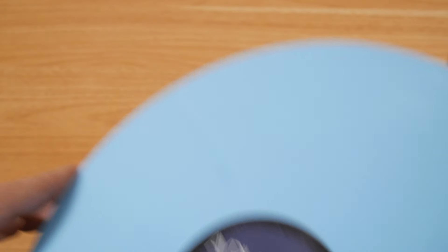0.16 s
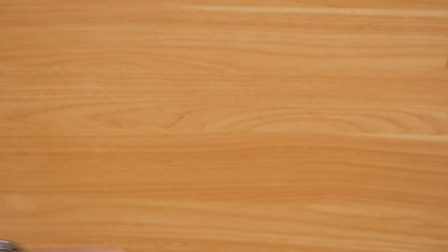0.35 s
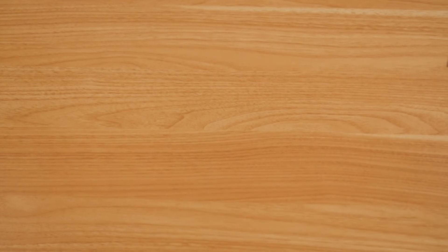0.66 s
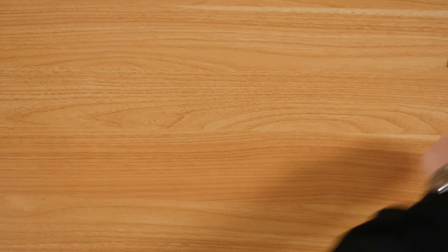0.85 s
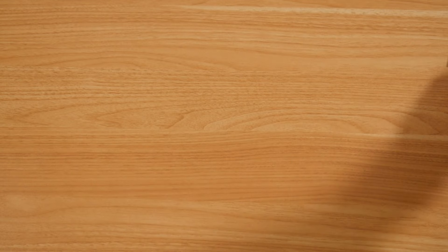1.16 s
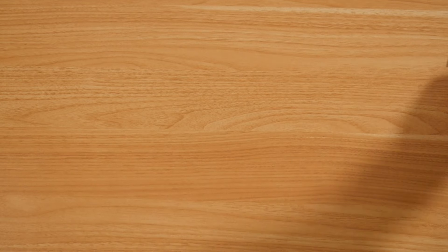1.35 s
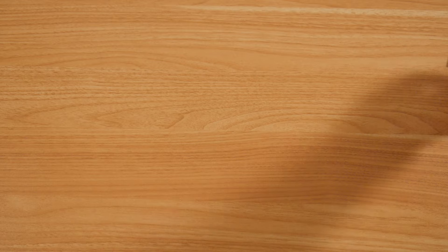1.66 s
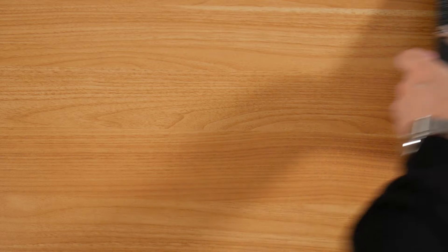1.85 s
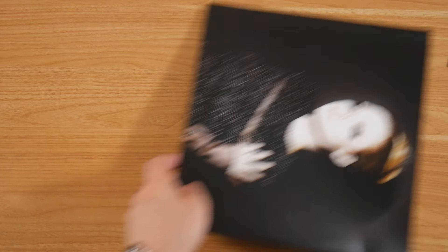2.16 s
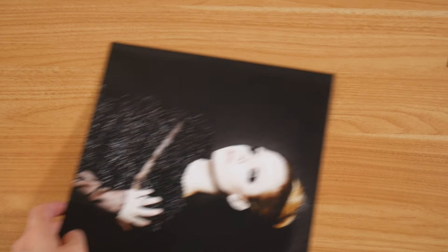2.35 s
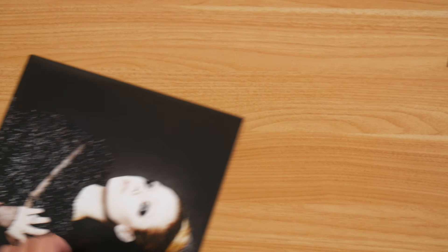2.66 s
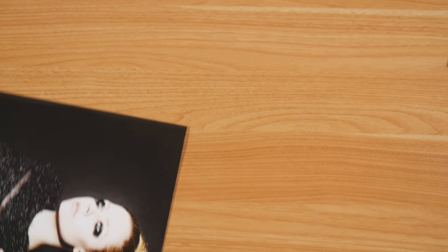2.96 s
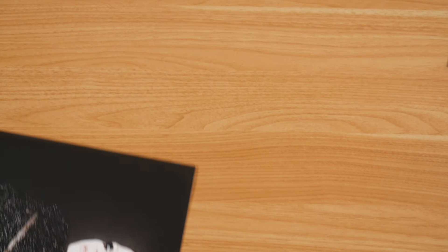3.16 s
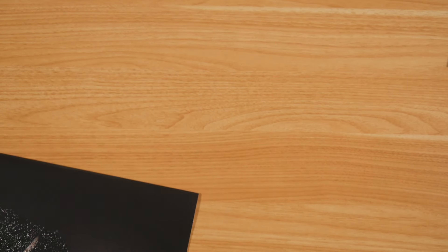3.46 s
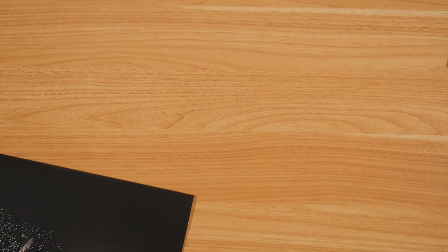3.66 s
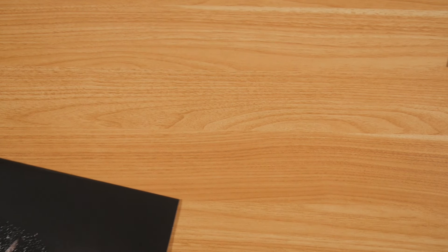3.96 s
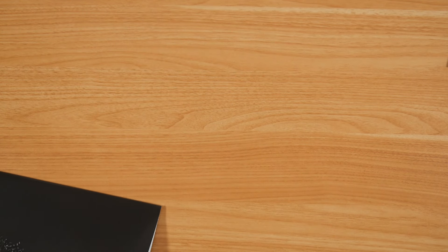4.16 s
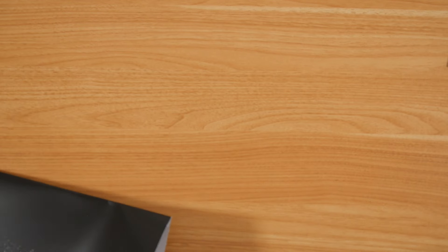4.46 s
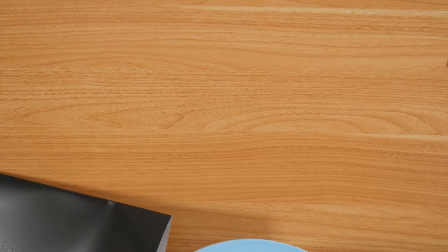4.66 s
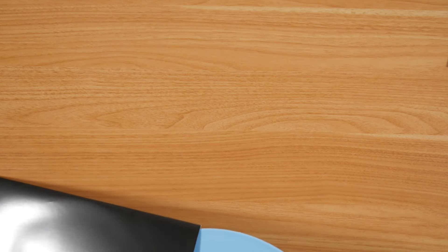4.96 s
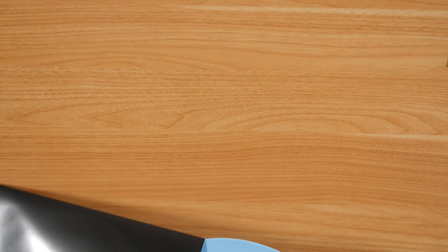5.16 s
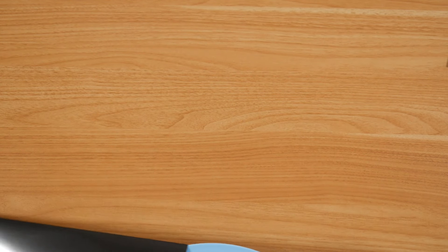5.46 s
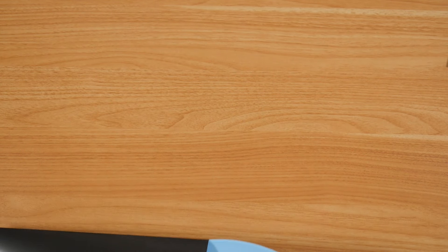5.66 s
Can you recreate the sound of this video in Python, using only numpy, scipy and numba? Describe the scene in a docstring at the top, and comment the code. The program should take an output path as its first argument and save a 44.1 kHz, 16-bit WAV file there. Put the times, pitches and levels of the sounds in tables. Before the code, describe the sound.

A small furnished room, heard closely, with faint air noise, low mains hum and a short soft echo. The first second is nearly still: a tiny papery tick at 0.1 s, then very faint hand brushing from 0.3 s. At about 1.07 s a record meets the wooden table with a dull, hollow knock, leaving a deep sub-bass sway from the microphone stand. From 1.2 s a card jacket is shoved in short, dry, bright scrapes, swelling into airy hissing slides around 2.0-2.7 s with brief chatter. A sharp snap and light bump at 2.82 s begin the dragging of the inner sleeve; softer fibrous strokes draw it out from 3.6 to 4.5 s. From 4.67 s the record pushes into the paper: fuller, lower rustling, crisp pops clustered at 4.83-5.0 s, a muffled tap near 5.3 s, another strong snap at 5.53 s, and short rustles until the end near 6 s.

```python
"""Record, card jacket and paper sleeve at a wooden table

A record is put down with a knock that rings the damped modes of the table top; lighter blows follow.
A hand brushes the table, the card jacket slides across it, the paper inner sleeve is drawn out and the
record is pushed into it: coloured fibre noise makes the scrapes, short resonant bursts the snaps.
Bumps sway the microphone stand; a small furnished room adds its echo, faint air noise and mains hum."""
import sys
import numpy as np
from scipy import signal
from scipy.fft import rfft, irfft
from scipy.io import wavfile
from scipy.ndimage import uniform_filter1d, map_coordinates
from numba import njit

SR = 44100
rng = np.random.default_rng(int(sys.argv[2]) if len(sys.argv) > 2 else 0)


def generate_wav(sig):
    """Save sig (samples, or channels by samples) to the path in sys.argv[1] as 16-bit PCM at SR."""
    pcm = np.round(np.clip(np.atleast_2d(sig).T, -1, 1) * 32767).astype(np.int16)
    wavfile.write(sys.argv[1], SR, pcm)


N = 255780
T = np.arange(N) / SR  # time in seconds


def undb(db):
    """Decibels to gain."""
    return 10 ** (np.asarray(db) / 20)


def rms(x):
    """Root mean square."""
    return np.sqrt(np.mean(x ** 2)) + 1e-12


def peak(x, db):
    """Scale to a peak level."""
    return x * undb(db) / np.abs(x).max()


def add(out, start_s, x):
    """Mix a sound in at its start time."""
    i = int(start_s * SR)
    out[i:i + len(x)] += x[:N - i]


def colour(x, points):
    """Filter by a spectrum of (Hz, dB) points, joined on a logarithmic frequency axis."""
    hz, db = np.transpose(points)
    f = np.maximum(np.fft.rfftfreq(N, 1 / SR), 1)
    gain = undb(np.interp(np.log(f), np.log(hz), db))
    return irfft(rfft(x) * gain, N)


def band(x, lo_hz, hi_hz):
    """Band-pass with steep skirts."""
    edges_hz = [lo_hz, min(hi_hz, .48 * SR)]
    return signal.sosfilt(signal.butter(3, edges_hz, "band", fs=SR, output="sos"), x)


@njit
def svf(x, hz, width):
    """State-variable resonance with a moving centre, gain 1 at the top."""
    y = np.empty(len(x))
    b, l = 0., 0.  # band-pass and low-pass memories
    for i in range(len(x)):
        g, k = np.tan(np.pi * hz[i] / SR), width / hz[i]
        v = (b + g * (x[i] - l)) / (1 + g * (g + k))
        b, l, y[i] = 2 * v - b, l + 2 * g * v, k * v
    return y


def resonate(x, hz, width_hz):
    """One resonance; its centre is a number or a curve."""
    return svf(x, hz * np.ones(len(x)), float(width_hz))


def fade(t, t60):
    """Exponential decay by 60 dB in t60 seconds."""
    return np.exp(-np.log(1000) * t / t60)


def ring(modes, t):
    """Damped sines of a struck body, neighbours in opposite sense."""
    out = np.zeros(len(t))
    for k, (hz, db, t60) in enumerate(modes):
        out += (-1) ** k * undb(db) * fade(t, t60) * np.sin(2 * np.pi * hz * t)
    return out


def walk(rate):
    """Smooth random wandering with unit spread, rate steps per second."""
    step = max(int(SR / rate), 1)
    held = np.repeat(rng.standard_normal(N // step + 1), step)
    wander = uniform_filter1d(held, step)[:N]
    return wander / rms(wander)


# Spectra of the contacts at the table: bare hand, card shoved, sliding and then dragged over the wood, # inner
# sleeve drawn out. Each row: frequency in Hz, relative level in dB.
HAND_COLOUR = [(120, -31), (200, -7), (298, -18), (677, -10), (974, -18), (1130, -15.5), (2560, -22),
               (15500, -30.5)]
SHOVE_COLOUR = [(240, -40), (400, -11), (438, -12), (552, -18), (614, -12.5), (784, -11.5), (1240, -8.5),
                (2290, -5.5), (2790, -1.5), (4290, -1), (5230, 0.5), (7550, -14.5), (12300, -19),
                (15500, -25.5)]
SLIDE_COLOUR = [(240, -37), (400, -9.5), (633, -11), (663, -11), (1130, -11.5), (1260, -7.5), (1850, -12.5),
                (2840, -3.5), (3680, -3), (4560, -10), (5650, -4), (6580, -10), (8930, -5), (11200, -1.5),
                (15500, -8.5)]
DRAG_COLOUR = [(180, -55), (300, -11), (404, 0), (581, -3.5), (674, 6.5), (985, -5.5), (1090, 2.5),
               (1350, 3.5), (1460, -2.5), (2360, -9), (3570, -7.5), (5300, -4), (7020, -9), (13100, -13),
               (15500, -22)]
DRAW_COLOUR = [(180, -45), (300, -24), (331, -0.5), (424, -12), (652, 3), (863, -5), (1200, 2),
               (1440, -2.5), (2320, -6.5), (3630, -2.5), (4420, -2.5), (5950, -8.5), (7140, -22.5),
               (14300, -37), (15500, -44)]


def jacket():
    """A hand brushes the table, smooth card hisses over the wood, and the inner sleeve slides out."""
    hand = rub("hand", HAND_COLOUR, slips(1800, 2.5, 3.3), judder_db=1.5, edge_db=-9, edge_hz=3600)
    shove = rub("shove", SHOVE_COLOUR, slips(5000, 2.2, 0.9), judder_db=1.44, edge_db=-9, edge_hz=3470)
    slide = rub("slide", SLIDE_COLOUR, slips(5000, 2.4, 1.7), judder_db=1.34, edge_db=-21, edge_hz=3400)
    drag = rub("drag", DRAG_COLOUR, slips(5000, 2.9, 1.7), judder_db=0.7, edge_db=-1.5, edge_hz=3700)
    draw = rub("draw", DRAW_COLOUR, slips(4000, 2.2, 0.99), judder_db=1.1, edge_db=0, edge_hz=3500)
    return flex(hand + shove + slide + drag + draw, depth_db=2, change_hz=16, width_hz=294.4)


# Spectrum of the record going into the paper. Each row: frequency in Hz, relative level in dB.
INSERT_COLOUR = [(60, 0), (115, 5), (200, -7.5), (330, -3.5), (480, -8.5), (640, 0), (790, -1.5),
                 (1020, -6.5), (1250, -3.5), (1600, -5.5), (3400, -3), (4400, -6), (6200, -8),
                 (7800, -13.5), (12500, -17.5), (15500, -27)]


def sleeve():
    """The record is pushed into loose paper, which crackles and buckles around it."""
    force = slips(2200, 2.7, 1.0)
    sound = rub("insert", INSERT_COLOUR, force, judder_db=1.77, edge_db=-15, edge_hz=3000)
    return flex(sound, depth_db=1.5, change_hz=20.77, width_hz=266)


EDGE_RISE = 0.18  # share of its full-speed pitch by which the edge climbs from rest
EDGE_WIDTH_HZ = 1040


def rub(contact, points, force, judder_db, edge_db, edge_hz):
    """Slips drive a sheet: its edge rasps, higher when faster, its face sounds lower, its fibres fizz on top."""
    speed, rasp_gain, body_gain, fizz_gain = strokes(contact)
    judder = undb(judder_db * walk(70))  # the hand never moves evenly
    sheet = colour(force * judder, points)
    body = band(sheet, 90, 2200) / rms(band(sheet, 550, 2200))
    rasp = band(sheet, 2200, 7000)
    fizz = band(sheet, 7000, 18000)
    edge_curve_hz = edge_hz * (1 + EDGE_RISE * (speed - 1))
    rasp = rasp + undb(edge_db) * resonate(rasp, edge_curve_hz, EDGE_WIDTH_HZ)
    return rasp_gain * rasp / rms(rasp) + body_gain * body + fizz_gain * fizz / rms(fizz)


def slips(rate, spread_db, hiss):
    """Fibres catch and let go: tiny clicks of uneven size over the hiss of countless smaller ones."""
    happens = rng.random(N) < rate / SR  # rate is clicks per second
    size_db = spread_db * np.minimum(rng.exponential(size=N), 5)
    clicks = happens * rng.choice([-1, 1], N) * undb(size_db)
    force = clicks / rms(clicks) + hiss * rng.standard_normal(N)
    return force / rms(force)


# Strokes of the hand; each speeds up, holds its speed and dies away. Each row: contact, start in seconds,
# rise in seconds, hold in seconds, release t60 in seconds, rasp in dB, body of the bending sheet in dB
# relative to the rasp, fizz of the fibres in dB relative to the rasp.
STROKES = [("hand", 0.293, 0.028, 0.047, 0.33, -62, 2.1, -10),
           ("hand", 0.387, .04, 0.042, 0.29, -65.5, -13, -6), ("hand", 0.525, .04, 0.44, 1.0, -70, -5, -4),
           ("hand", 0.883, 0.2, 0.065, 0.49, -65, 0, -7.5),
           ("shove", 1.233, 0.034, 0.042, 0.38, -47.5, -9.5, -7),
           ("shove", 1.326, 0.055, .2, .5, -57, -9, -10),
           ("shove", 1.524, .14, 0.033, 0.53, -51.5, -7, -4.5),
           ("shove", 1.692, 0.063, 0.064, 0.54, -44, -12, -3.5),
           ("shove", 1.847, 0.046, 0.075, 0.54, -46, -12.5, -1.4),
           ("shove", 2.018, 0.064, 0.046, 0.53, -41.5, -9, -2.5),
           ("slide", 2.19, .08, 0.096, 0.71, -42, -21, -5),
           ("slide", 2.373, .07, 0.069, 0.24, -46.5, -12.5, -5.5),
           ("slide", 2.59, 0.027, .21, 0.3, -47, -16, -4), ("drag", 2.86, 0.1, .03, .4, -52, -15, -5.5),
           ("drag", 2.97, .12, .13, 0.59, -41.5, -16.5, -5), ("drag", 3.14, .11, .11, .25, -47.5, -4.5, -7),
           ("drag", 3.411, 0.0035, 0.019, 0.42, -48.5, -10.5, -14),
           ("drag", 3.47, 0.031, .006, .12, -53.5, -10, -7.5),
           ("draw", 3.595, .06, 0.016, 0.39, -50, -9, -2),
           ("draw", 3.70, 0.047, 0.039, 0.14, -48, -8.5, -1.7),
           ("draw", 3.82, .03, 0.062, 0.52, -49, -12.5, -2.5),
           ("draw", 3.935, 0.074, .1, .65, -44.5, -12, -4), ("draw", 4.14, .06, .012, .2, -47, -9, -10),
           ("draw", 4.295, 0.064, .1, 0.35, -47, -15.5, -7.5),
           ("draw", 4.38, 0.052, 0.023, 0.25, -49.5, -12.5, 1),
           ("insert", 4.665, .11, 0.079, 0.59, -42, -6, -13),
           ("insert", 4.87, .045, .04, 0.24, -42.5, -3.5, -8.5),
           ("insert", 5.0, 0.036, 0.027, 0.31, -54.5, -2.3, -4.5),
           ("insert", 5.13, 0.027, 0.11, 0.34, -52, -6, -9.5),
           ("insert", 5.32, 0.048, 0.091, 0.34, -60, -1, -14),
           ("insert", 5.425, 0.083, .025, .4, -42, -4, -9.5),
           ("insert", 5.61, 0.052, 0.022, .45, -48.5, -1.2, -7.5),
           ("insert", 5.75, .025, .03, .3, -48, -4.5, -8.5)]
# powers of speed: the rasp grows in step with it, the body more slowly, the fizz faster
BODY_POWER, FIZZ_POWER = 0.84, 1.12


def strokes(contact):
    """Speed of one contact (0-1), and the gains of rasp, body and fizz that its strokes give."""
    t = T[::64]
    speed, rasp, body, fizz = np.zeros((4, len(t)))
    for name, start_s, rise_s, hold_s, t60, db, body_db, fizz_db in STROKES:
        if name == contact:
            release = fade(np.maximum(t - start_s - rise_s - hold_s, 0), t60)
            v = np.clip((t - start_s) / rise_s, 0, 1) * release
            speed = np.maximum(speed, v)
            # overlapping strokes add in power
            rasp = np.hypot(rasp, undb(db) * v)
            body = np.hypot(body, undb(db + body_db) * v ** BODY_POWER)
            fizz = np.hypot(fizz, undb(db + fizz_db) * v ** FIZZ_POWER)
    return [np.interp(T, t, curve) for curve in (speed, rasp, body, fizz)]


def flex(x, depth_db, change_hz, width_hz):
    """A bending sheet shifts its resonances: peaks and valleys of the spectrum come and go."""
    size, hop = 512, 256
    _, _, z = signal.stft(x, nperseg=size)
    f, t = np.indices(z.shape)
    place = [f * SR / size / width_hz, t * hop / SR * change_hz]
    ripple = map_coordinates(rng.standard_normal((128, 128)), place, order=2, mode="wrap")
    return signal.istft(z * undb(depth_db * ripple))[1][:N]


# The edge catches and chatters. Each row: start in seconds, length in seconds, rms level in dB before the
# ends are tapered, centre at mid-length in Hz, resonance width in Hz, glide in octaves per second.
CHATTERS = [(1.489, .11, -60, 4600, 450, -.6), (1.56, 0.18, -64, 1500, 500, -4),
            (1.735, 0.086, -47.5, 3270, 800, 2), (1.92, 0.082, -45.5, 5180, 800, 0.5),
            (2.056, 0.093, -44.5, 1620, 1100, 1), (2.194, 0.075, -45.5, 2730, 450, 1),
            (2.232, 0.071, -44, 5640, 700, 0), (2.52, 0.034, -50.5, 1600, 600, 0),
            (2.679, 0.17, -47.5, 3170, 920, 0), (4.166, .055, -47, 2650, 800, -6),
            (4.92, 0.058, -47, 1980, 400, 0), (5.506, .026, -39.5, 756, 247, 0),
            (5.509, .014, -42, 6500, 450, 0), (5.641, 0.054, -48, 1310, 700, 0)]


def chatters():
    """Brief stick-slip that locks on to one resonance of the sheet, which glides as the grip shifts."""
    out, t = np.zeros(N), T[:SR // 3]
    for start_s, length_s, db, hz, width_hz, glide in CHATTERS:
        n = int(length_s * SR)
        centre = hz * 2 ** (glide * (t - t[-1] + length_s / 2))
        tone = resonate(rng.standard_normal(len(t)), centre, width_hz)
        tone = resonate(tone, centre, width_hz)[-n:]  # keep the end, where the resonance has built up
        add(out, start_s, undb(db) * tone / rms(tone) * signal.windows.tukey(len(tone), .7))
    return out


# Snaps of paper and taps of the record's rim. Each row: start in seconds, peak level in dB, snap centre in
# Hz, width of each of its two resonances in Hz, crumple t60 in seconds, sleeve body in dB relative to the snap.
SNAPS = [(.109, -46, 1790, 3000, 0.064, 2), (.544, -49, 2370, 3500, .022, -3),
         (1.2339, -33.5, 3660, 7400, .0084, -15), (1.491, -43, 2000, 3500, .011, -15),
         (2.603, -37, 7450, 8000, 0.051, -17), (2.8218, -21.5, 3040, 1100, .015, -28),
         (2.8321, -28, 3500, 3500, 0.0085, -15), (3.4112, -30.5, 4500, 5500, .012, -38),
         (4.304, -38, 4020, 3500, .03, -16), (4.681, -39, 2500, 4000, .03, 0),
         (4.833, -18.5, 5600, 4500, .0023, -7), (4.902, -26.5, 2300, 1400, .013, -11),
         (4.9145, -18.5, 1980, 1010, 0.02, -3.5), (4.926, -32, 2020, 700, .012, -8),
         (5.002, -28.5, 3750, 4950, 0.017, -11), (5.481, -34, 3780, 3520, .004, -26),
         (5.508, -33.5, 4500, 4450, .007, -7.5), (5.533, -22.5, 3000, 1400, .025, -14),
         (5.668, -33, 3000, 3500, .006, -11), (5.774, -38, 5000, 6000, 0.011, -14)]
# Modes of the hollow sleeve. Each row: unflexed frequency in Hz, relative level in dB, t60 in seconds.
SLEEVE = [(504, 2, 0.0091), (698, 5.5, 0.017), (824, 7, 0.014), (1280, 3.5, 0.0076), (1980, -6, 0.014)]


def snaps(crumple=0.52):
    """A fold pops: one sharp release, a short crumple after it, and the hollow ring of the sleeve."""
    out, t = np.zeros(N), T[:SR // 8]
    for start_s, db, hz, width_hz, t60, body_db in SNAPS:
        force = crumple * rng.standard_normal(len(t)) * fade(t, t60)
        force[0] += 1
        snap = resonate(resonate(force, hz, width_hz), hz, width_hz)
        bend = 1 + 0.068 * rng.standard_normal()  # the sleeve is flexed differently every time
        body = ring([(f * bend, d, decay) for f, d, decay in SLEEVE], t)
        add(out, start_s, peak(peak(snap, 0) + peak(body, body_db), db))
    return out


# Blows on the table. Each row: start in seconds, peak level in dB, frequency driven best in Hz, width of
# the driven range in octaves, ring length as a multiple of that of the free top.
KNOCKS = [(1.0677, -25, 348, 1.3, 1.25), (2.171, -43.5, 450, 2.2, 0.58), (2.824, -37, 191, 0.87, 0.82),
          (2.852, -41, 271, 0.47, 1.07), (4.16, -50, 170, 0.94, .8), (4.68, -37.5, 190, 2.1, 0.41),
          (4.835, -39, 195, 0.61, 1), (4.932, -42.5, 158, 1.6, 1.2), (5.054, -40.5, 140, 1.4, 0.61),
          (5.297, -32.5, 543, 0.77, 0.41), (5.393, -44.5, 300, 0.77, 0.39), (5.432, -39.5, 247, 1.3, 0.6)]
# Modes of the free table top. Each row: frequency in Hz, relative level in dB, t60 in seconds.
TABLE = [(119, 0, 0.286), (158, -16, 0.6), (236.2, -3.5, 0.18), (269, -9, 0.19), (281.2, -10, 0.28),
         (315, -6, 0.21), (350.7, -13, 0.21), (383.4, -7, 0.15), (409.6, 5.5, 0.06), (487, -7.5, 0.083),
         (511, -8, 0.18), (606, -17.5, 0.27), (710, -31, .18), (825, -22, .12), (1080, -30, .12)]


def knocks(rattle_db=-19):
    """Blows ring the table top; place and softness of the contact choose the modes, with a dull rattle."""
    out, t = np.zeros(N), T[:SR]
    for start_s, db, hz, octaves, free in KNOCKS:
        modes = [(f, d - 10 * (np.log2(f / hz) / octaves) ** 2, t60 * free) for f, d, t60 in TABLE]
        noise = band(rng.standard_normal(len(t)), 110, 1600)
        rattle = resonate(noise, hz, hz) * fade(t, .5 * free)
        add(out, start_s, peak(peak(ring(modes, t), 0) + peak(rattle, rattle_db), db))
    return out


# Heavy bumps that set the microphone stand swaying. Each row: start in seconds, gain of the sway in dB.
BUMPS = [(1.101, -33), (2.879, -31.5)]
# Modes of the stand. Each row: frequency in Hz, relative level in dB, t60 in seconds.
STAND = [(8.906, 0, 7.3), (10.75, -13.5, 6.8), (34.98, -5, 4)]


def stand(rise_s=0.049, shudder_db=-26, rumble_db=-67):
    """The microphone stand rocks far down in the bass and shudders as it rocks, over a steady rumble."""
    out = np.zeros(N)
    sway = (1 - np.exp(-T / rise_s)) * ring(STAND, T)
    for start_s, db in BUMPS:
        add(out, start_s, undb(db) * sway)
    swing = np.sqrt(np.abs(uniform_filter1d(out ** 2, size=SR // 5)))  # running level of the sway
    shudder = colour(rng.standard_normal(N), [(15, -15.0), (55, 12.5), (90, -5.5), (150, -1.5), (400, -70)])
    return out + shudder / rms(shudder) * (undb(shudder_db) * swing + undb(rumble_db))


def room(x, wet_db, t60):
    """The dense echo of a small furnished room: decaying noise that starts after 3 ms."""
    t = T[:SR // 2]
    echo = band(rng.standard_normal(len(t)), 146, 9900) * fade(t, t60) * (t > .003)
    return undb(wet_db) * signal.fftconvolve(x, echo / np.sqrt(np.sum(echo ** 2)))[:N]


# Spectrum of the still room air. Each row: frequency in Hz, relative level in dB.
AIR = [(20, 19), (35, 15), (100, -5.5), (160, -1.5), (200, -5.5), (260, 0.5), (370, -7.5), (600, -11.5),
       (770, -8), (1000, -14.5), (2500, -18.5), (5500, -23.5), (8000, -25), (15500, -27)]
AIR_DB = -63.5  # rms between 100 Hz and 15 kHz
HUM_HZ, HUM_DB = 50, -48.5  # peak level


def background():
    """Still room air as coloured noise, and mains hum as one sine."""
    air = colour(rng.standard_normal(N), AIR)
    air *= undb(AIR_DB) / rms(band(air, 100, 15000))
    return air + undb(HUM_DB) * np.sin(2 * np.pi * HUM_HZ * T)


def scene(hiss_db=-73, sleeve_width_db=-2):
    """All sources lie straight ahead; the broad jacket spreads a little between the ears, the sleeve less."""
    card, paper = jacket(), sleeve()
    near = card + paper + chatters() + snaps() + knocks()
    mid = near + room(near, wet_db=-12.5, t60=0.54) + background() + stand()
    spread = room(card + undb(sleeve_width_db) * paper, wet_db=-5, t60=0.062)
    side = colour(spread, [(100, -17), (250, -22.0), (600, -16.0), (2000, -19), (5000, -18), (8000, -14),
                           (11000, -7.5), (15000, 6)])
    # hiss of opposite sign in the two channels; hiss_db is its level before colouring
    hiss = undb(hiss_db) * rng.standard_normal(N)
    side += colour(hiss, [(50, -5), (250, 7.5), (1000, 2), (2500, -0.5), (15000, -0.5)])
    return np.array([mid + side, mid - side])


TOP_HZ = 15750


def record(dry):
    """The recorder cuts the top with a steep low-pass."""
    return signal.sosfilt(signal.ellip(10, .2, 80, TOP_HZ, fs=SR, output="sos"), dry)


dry = scene()
out = record(dry)
generate_wav(out)
```